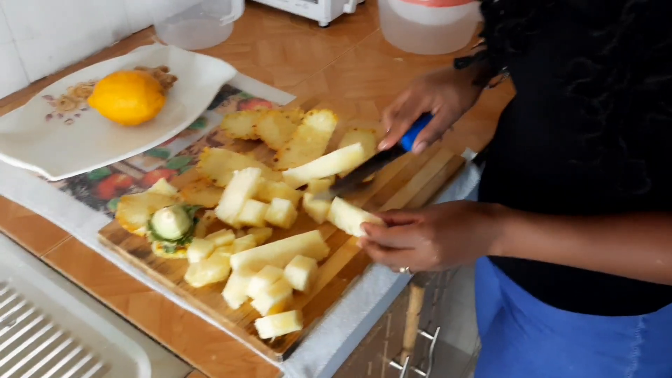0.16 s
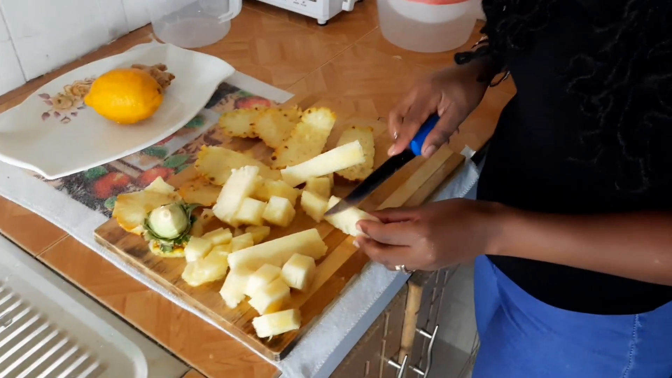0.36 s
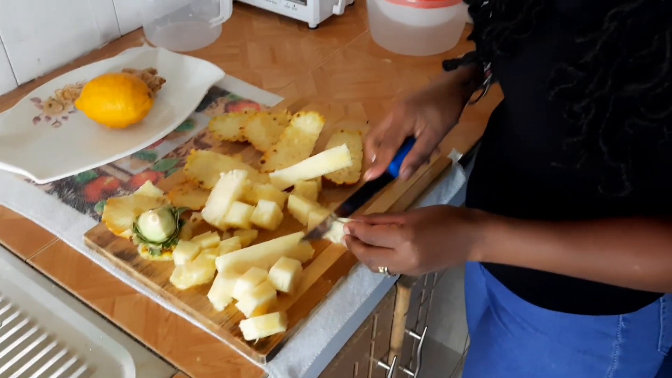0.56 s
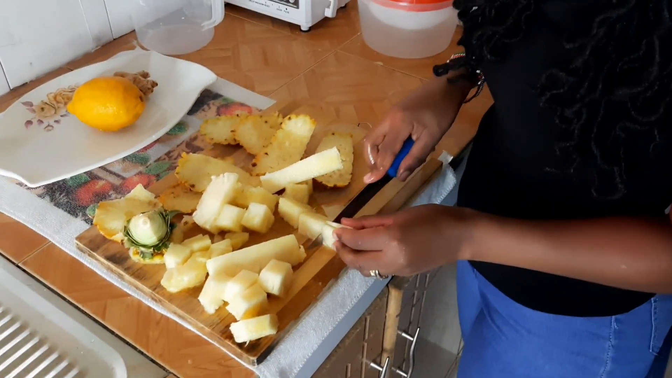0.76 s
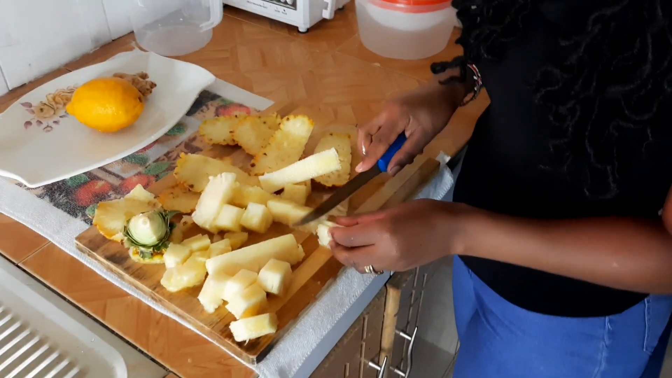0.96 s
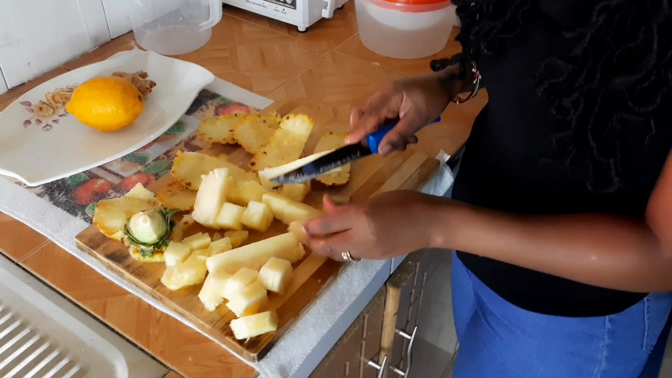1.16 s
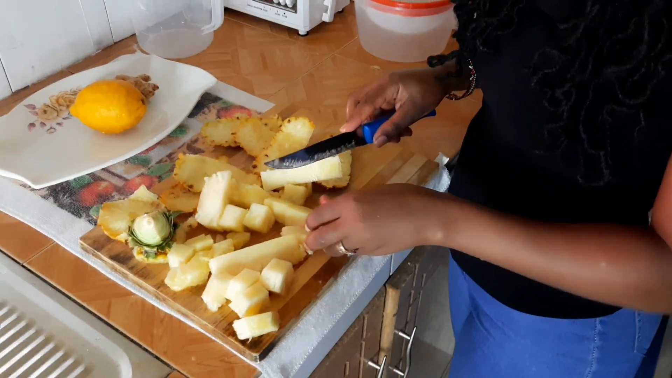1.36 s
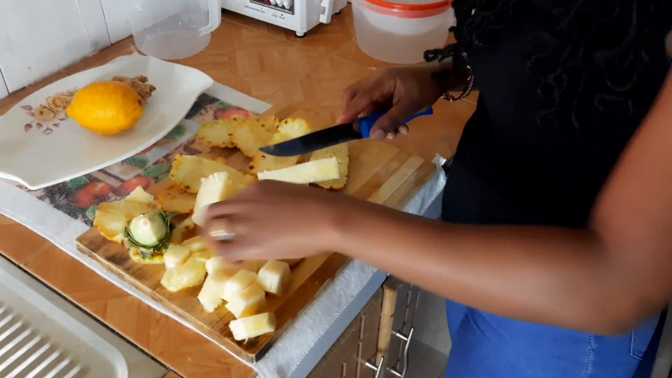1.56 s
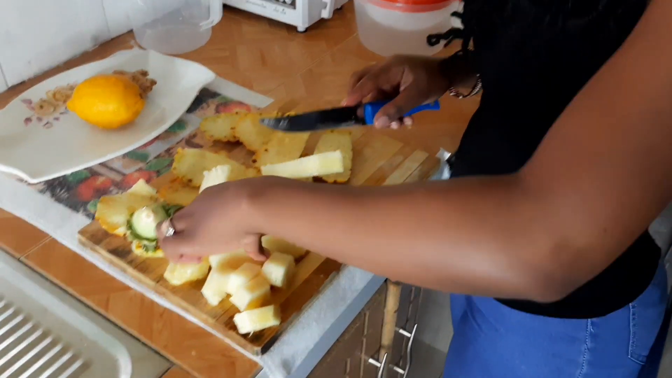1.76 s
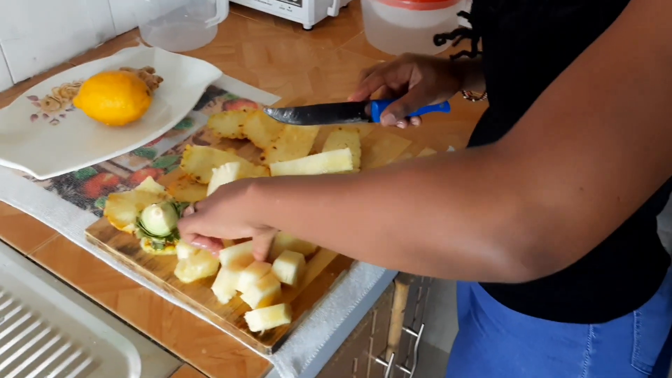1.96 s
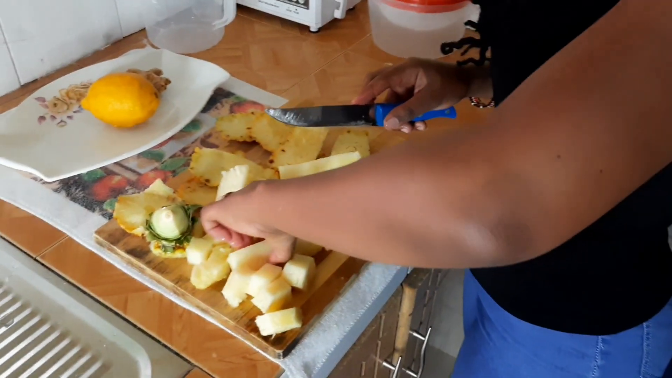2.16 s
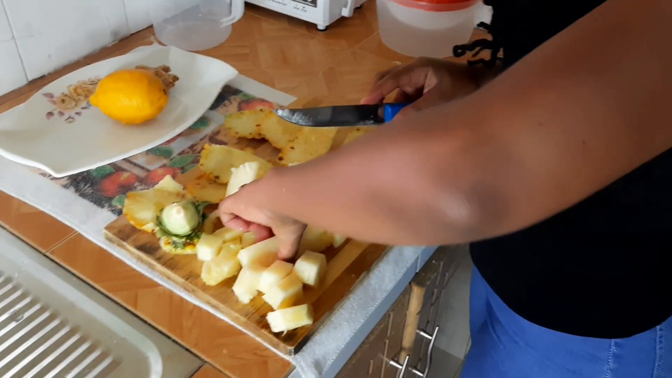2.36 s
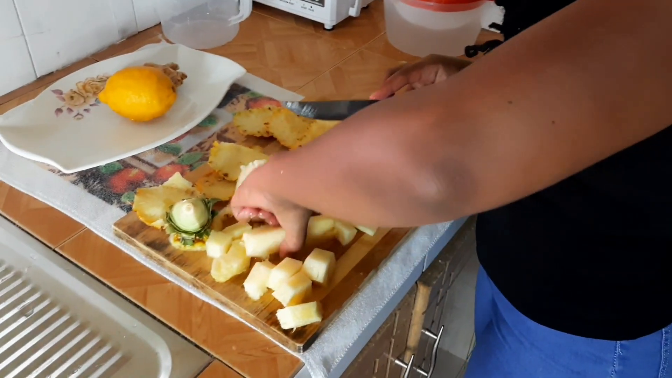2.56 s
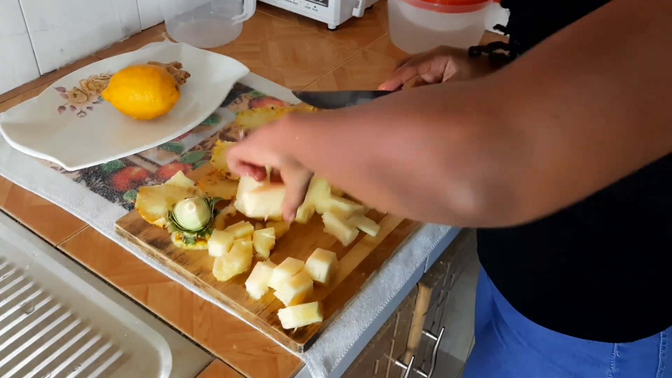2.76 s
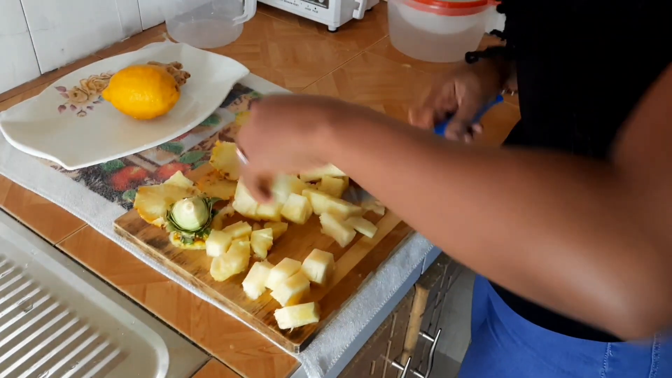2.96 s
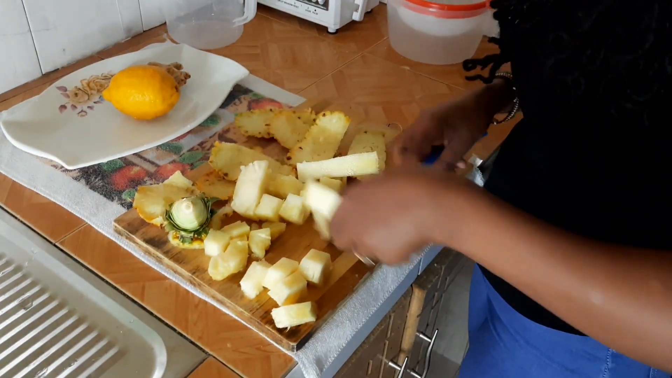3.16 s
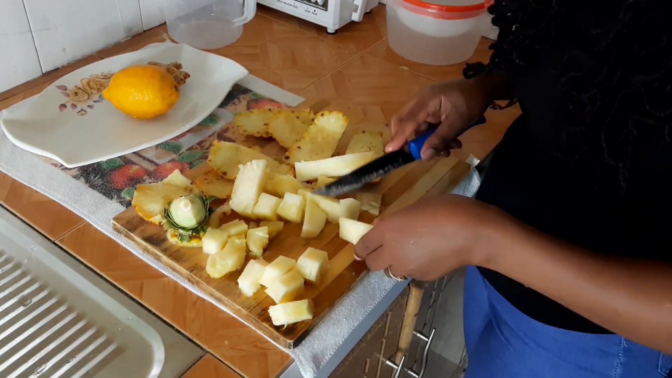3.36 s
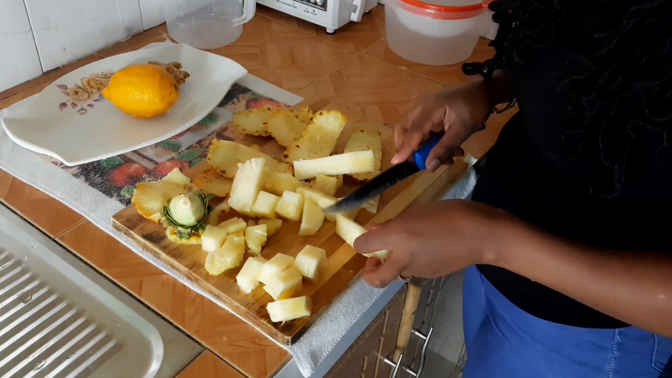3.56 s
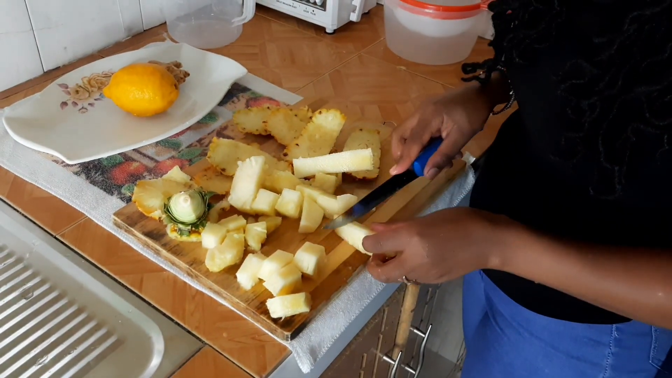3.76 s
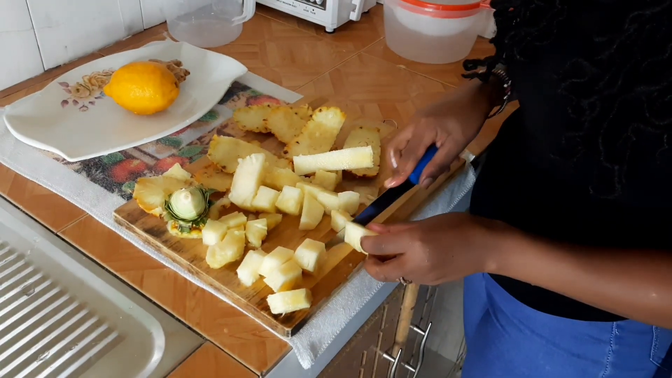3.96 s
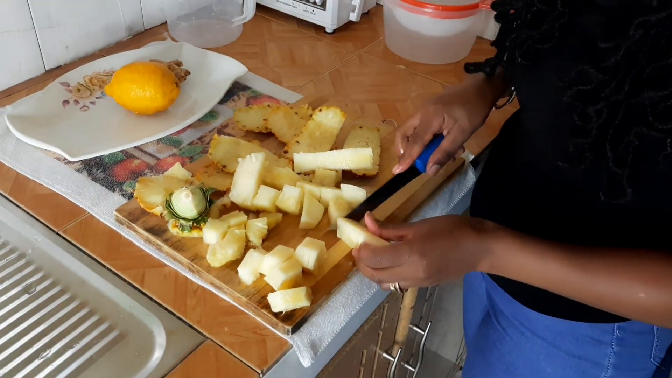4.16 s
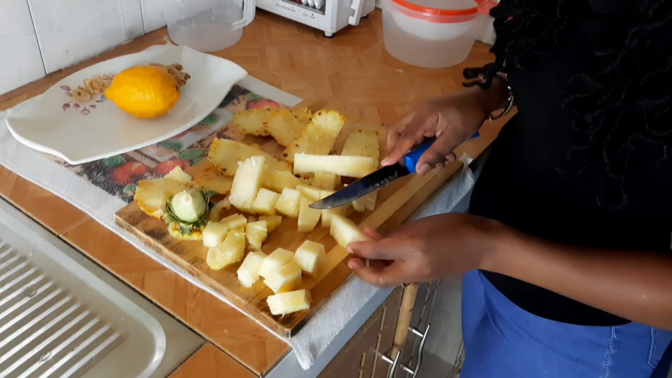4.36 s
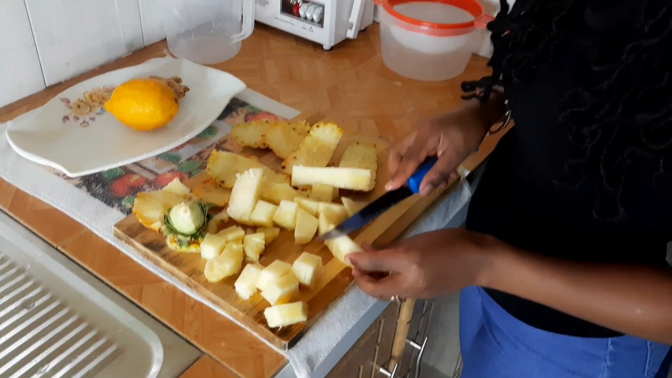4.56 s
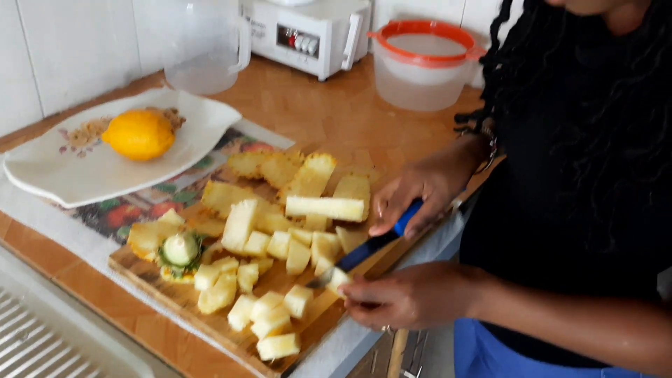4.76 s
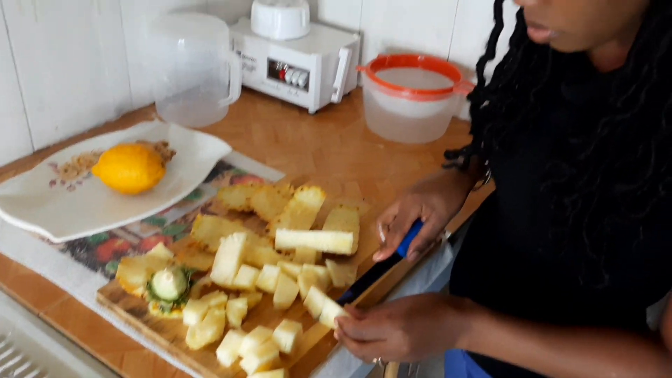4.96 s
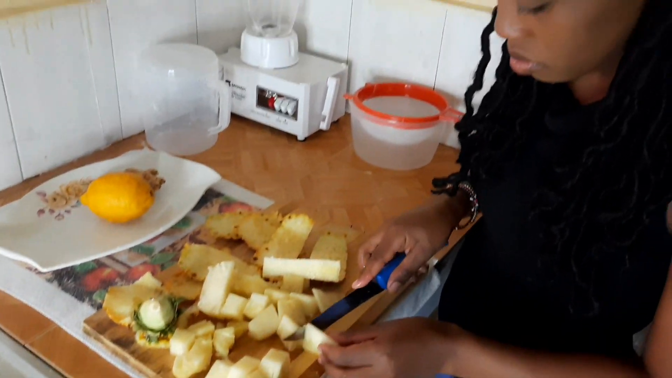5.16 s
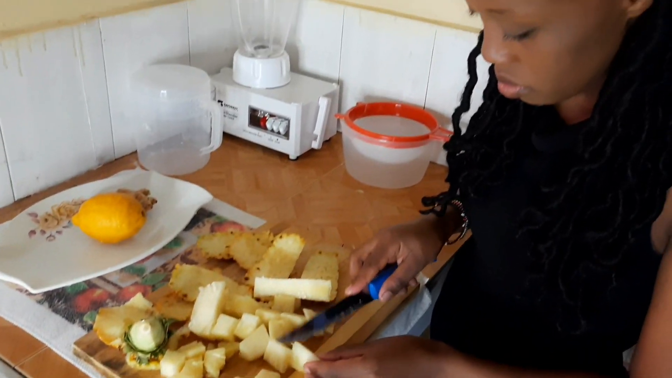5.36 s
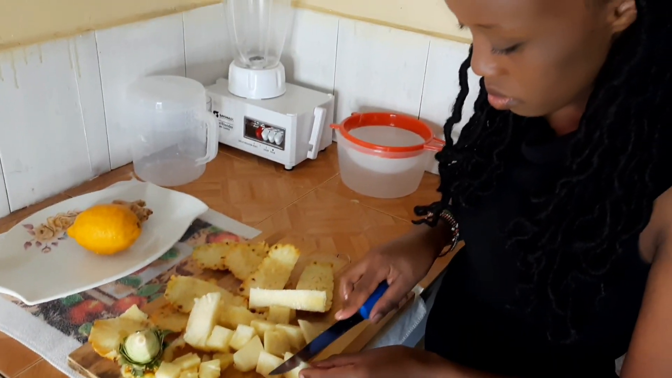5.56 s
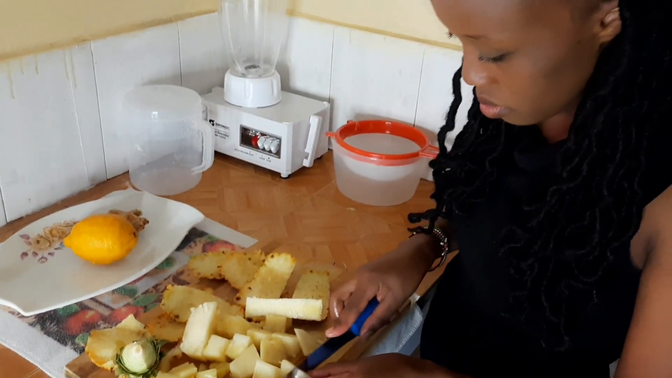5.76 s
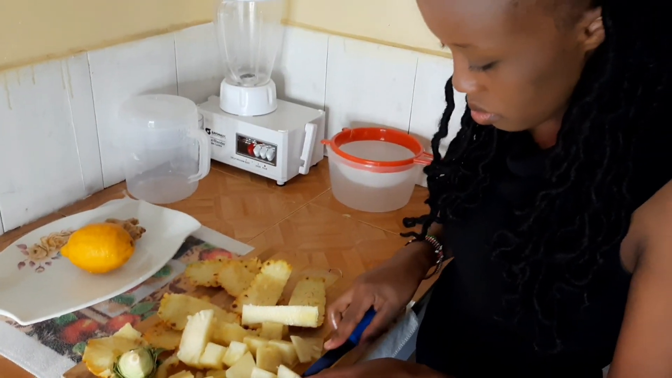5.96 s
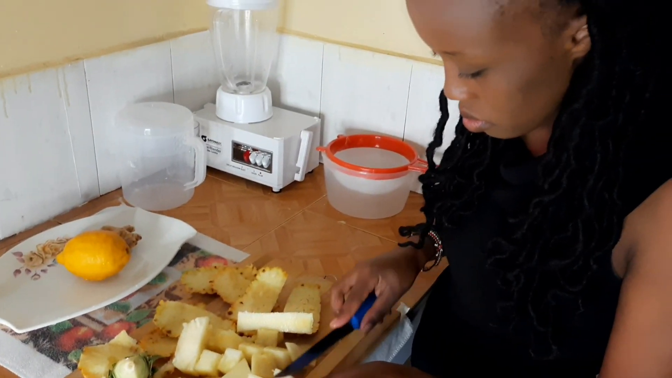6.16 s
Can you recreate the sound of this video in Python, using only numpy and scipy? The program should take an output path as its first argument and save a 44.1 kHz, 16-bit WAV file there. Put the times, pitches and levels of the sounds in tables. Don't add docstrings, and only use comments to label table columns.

```python
import sys
import numpy as np
from scipy import signal
from scipy.io import wavfile

SR = 44100
rng = np.random.default_rng(int(sys.argv[2]) if len(sys.argv) > 2 else 0)


def elevation(decibels):
    levels = np.asarray(decibels, float)
    return 10 ** (levels / 20)


def store_wav(level_fs):
    pcm = np.round(np.clip(np.atleast_2d(level_fs), -1, 1) * 32767)
    wavfile.write(sys.argv[1], SR, pcm.T.astype(np.int16))


N = 273949


def rms_one(x):
    return x / np.sqrt(np.mean(x ** 2) + 1e-20)


def at_hz(points, hz):
    table_hz, values = np.array(points).T
    return np.interp(np.log(hz), np.log(table_hz), values)


def lowpass(x, order, hz):
    return signal.sosfilt(signal.butter(order, hz, fs=SR, output="sos"), x)


def band(x, low_hz, high_hz):
    return signal.sosfilt(signal.butter(2, [low_hz, min(high_hz, .47 * SR)], "band", fs=SR, output="sos"), x)


def drift(rate_hz):
    r = np.exp(-80 * np.pi * rate_hz / SR)
    slow = signal.lfilter([1], [1, -2 * r, r * r], rng.standard_normal(N // 40 + 2002))[2000:]
    return np.interp(np.arange(N) / 40, np.arange(len(slow)), rms_one(slow))


def ring(push, hz, t60):
    r, w = elevation(-60 / (t60 * SR)), 2 * np.pi * hz / SR
    return signal.lfilter([0, np.sin(w)], [1, -2 * r * np.cos(w), r * r], push + 1e-18)


# [pitch_hz, likeness (1 = same)]
LIKENESS = [(60, 0.5), (180, 0.92), (550, 0.61), (1650, -0.1), (4970, 0.018), (15000, 0.0018)]
# [pitch_hz, left_over_right_db]
LEAN = [(60, 2.5), (240, -0.5), (950, -1), (3770, -6.5), (15000, -3.5)]


def stereo_bands(white, gain_of_band, first=0):
    out = 0
    edges = 28 * 2 ** (np.arange(first, 29) / 3)
    for k, (low, high) in enumerate(zip(edges, edges[1:])):
        hz = np.sqrt(low * high)
        mid, side = band(white[k % 2], low, high)
        alike = np.clip(at_hz(LIKENESS, hz), -.99, .99)
        lean = elevation(at_hz(LEAN, hz) * np.array([[.5], [-.5]]))
        pair = np.sqrt(1 + alike) * mid + np.sqrt(1 - alike) * side * [[1], [-1]]
        out = out + gain_of_band(hz) * lean * pair
    return out


# [pitch_hz, level_db per Hz]
RUMBLE = [(18, -50), (30, -18.5), (65, -4), (168, -11), (202, 0.5), (226, -12.5), (318, 1), (509, -18),
          (571, -22.5), (900, -24.5), (1170, -57), (1980, -120)]
# [pitch_hz, level_db per Hz]
HISS = [(530, -36), (900, -14.5), (1340, -16), (1720, -13), (2830, -11.5), (3470, -6), (3860, -12),
        (7680, -4), (10400, -18.5), (14700, -5.5), (16000, -14.5)]
# [pitch_hz, width_hz, level_db]
HUM = [(54.3, 7.25, -76), (68.8, 8.9, -72), (198, 9.9, -65), (314, 250, -73.5), (508, 12, -79.5),
       (1692, 82, -86.5)]


def room_tone():
    rumble_db, hiss_db = -53.5, -69.5
    together = drift(1.8)

    def colour(hz):
        level_db = rumble_db + at_hz(RUMBLE, hz) if hz < 900 else hiss_db + at_hz(HISS, hz)
        return elevation(level_db + 0.25 * together + 0.59 * drift(24))

    out = elevation(12.5) * stereo_bands(rng.standard_normal((2, 2, N)), colour)
    for hz, width_hz, db in HUM:
        t60 = np.log(1000) / (np.pi * width_hz)
        once = ring(rng.standard_normal(N), hz, t60)
        out += elevation(db) * rms_one(ring(once, hz, t60))
    phase = 2 * np.pi * 199.7 * np.arange(N) / SR
    return out + elevation(-58.5 + 1.01 * drift(6.8)) * np.sin(phase)


# [pitch_hz, t60_s]
WALLS = [(250, 0.76), (600, 0.52), (1500, 0.55), (4000, 0.56), (9000, 0.19)]
# [delay_s, left_db, right_db]
ECHOES = [(.0024, -10.5, -8), (.0043, -1, 1.5), (.008, -10, -5.5), (0.01, -13.5, -10.5)]


def kitchen(x, direct_db, early_db, early_t60, tail_db, build_s):
    first_sound = np.zeros((2, round(.03 * SR)))
    first_sound[:, 0] += elevation([direct_db + 3, direct_db])
    for s, left_db, right_db in ECHOES:
        first_sound[0, round(s * SR)] -= elevation(left_db)
        first_sound[1, round(s * SR * 1.06)] -= elevation(right_db)
    out = signal.fftconvolve(x[None], first_sound, axes=1)[:, :N]

    t = np.arange(round(.8 * SR)) / SR

    def dying(hz):
        return elevation(tail_db - 60 * t / at_hz(WALLS, hz)) + elevation(early_db - 60 * t / early_t60)

    spot = 2 * np.pi * .37 * np.arange(N) / SR
    for share in (np.cos(spot), np.sin(spot)):
        tail = stereo_bands(rng.standard_normal((2, 2, len(t))), dying, first=5.89)
        tail = tail * (1 - np.exp(-t / build_s))
        out = out + signal.fftconvolve((share * x)[None], tail, axes=1)[:, :N]
    return out


# [start_s, peak_db, pitch_hz]
THUDS = [
    (0.48, -63, 109),
    (1.299, -57, 115),
    (3.449, -57.5, 113),
    (5.249, -58.5, 141),
]


def thuds():
    out, t = np.zeros(N), np.arange(round(.2 * SR)) / SR
    for s, db, hz in THUDS:
        i = round(s * SR)
        swell = (t / 0.011) * np.exp(1 - t / 0.015)
        out[i:i + len(t)] += elevation(db) * np.sin(2 * np.pi * hz * t) * swell
    return out


# [start_s, level_db]
TAPS = [
    (4.6513, -24.5),
    (4.669, -42.5),
]


def taps():
    clicks = np.zeros(N)
    for s, db in TAPS:
        clicks[round(s * SR)] = -elevation(db)
    push = band(clicks, 190, 1540)
    thump = ring(push, 475, 0.0084) + elevation(-11) * ring(push, 1090, 0.0084)
    return thump * elevation([[-24], [6]])


# [start_s, length_s, pitch_hz,
# level_db]
SLIDES = [
    (1.086, 0.073, 2580, -52.5),
    (1.791, 0.13, 2600, -67),
    (2.288, .2, 3400, -69),
    (2.334, .006, 8600, -56),
    (2.76, 0.097, 3200, -70),
    (2.778, 0.0061, 7700, -53),
    (5.706, 0.04, 4670, -65),
    (5.951, 0.093, 2770, -62),
]


def slides():
    out = np.zeros((2, N))
    for s, length, hz, db in SLIDES:
        stroke = np.sin(np.pi * np.arange(round(length * SR)) / (length * SR))
        swish = band(rng.standard_normal((2, round(.3 * SR))), hz / 1.18, hz * 1.14)[:, :len(stroke)]
        i = round(s * SR)
        out[:, i:i + len(stroke)] += elevation(db) * rms_one(swish) * stroke * elevation([[-3], [3]])
    return out


def strokes(rows, attack_s, release_s, body_db):
    t = np.arange(0, N + 19, 20)[:N // 20 + 1] / SR
    out = np.zeros((3, len(t)))
    for s, hold, db, sizzle_db in rows:
        rise = np.clip((t - s) / attack_s, 0, 1)
        fade = np.exp(-np.maximum(t - s - attack_s - hold, 0) / release_s)
        levels = elevation(db + np.array([[body_db], [0], [sizzle_db]]))
        out += (levels * rise * fade) ** 2
    return np.array([np.interp(np.arange(N) / SR, t, row) for row in out])


# [start_s, hold_s, level_db, sizzle_db]
SLICES = [(-0.02, 0.068, -58, -4), (0.855, 0.045, -60, -4.5), (0.985, 0.018, -64, -7),
          (4.18, .025, -63.5, -5), (4.215, 0.022, -58, -4), (5.003, 0.026, -58, -3), (5.1, .04, -63, -6),
          (5.15, 0.031, -58.5, -10), (5.945, .015, -60, -8), (6.055, 0.047, -61, -4),
          (6.11, 0.043, -58, -3.5)]
# [start_s, hold_s, level_db, sizzle_db]
PULLS = [
    (0.17, 0.056, -57, -4.5),
    (0.283, 0.0073, -48.5, -9.5),
    (1.04, 0.055, -59, -13),
    (1.15, 0.029, -59, -10),
    (3.425, 0.038, -52.5, -7),
    (3.515, .012, -56.5, -10),
    (5.31, .055, -59, -10),
]
# [start_s, hold_s, level_db, sizzle_db]
GRIPS = [(0.45, .04, -66.5, -3), (0.6, .2, -77, -4), (1.2, 0.093, -65.5, -4.5), (1.45, .02, -65, -6),
         (1.74, .03, -64.5, 0), (1.78, .09, -61, -3), (1.92, 0.13, -64.5, -0.5), (2.1, 0.2, -66, -3),
         (2.33, 0.16, -68.5, -3.5), (2.53, 0.11, -67, -3), (2.77, 0.055, -70.5, -9), (2.95, 0.16, -75, -5),
         (3.6, 0.14, -67.5, -10), (3.9, .015, -73.5, 0), (4.66, 0.052, -71.5, -3), (5.7, .03, -70, -15),
         (5.76, .02, -79.5, 3), (5.86, .04, -65, -5)]
# [pitch_hz, level_db per Hz]
FIBRE = [(710, -30), (1200, -6.5), (1920, -5.5), (2620, -9.5), (5090, 2.5), (7570, 7.5), (9990, -6),
         (11900, 9.5), (15500, 6)]


def wet_flesh():
    splashes = [(s, 0, -56 + .4 * (db + 16), -6.5) for s, db, *_ in CHOPS]
    power = strokes(SLICES, attack_s=.015, release_s=0.057, body_db=9)
    power = power + strokes(PULLS, attack_s=0.0073, release_s=.04, body_db=11)
    power = power + strokes(GRIPS, attack_s=0.023, release_s=.06, body_db=5)
    power = power + strokes(splashes, attack_s=.003, release_s=.07, body_db=3)
    rest_db = -79
    body, middle, sizzle = np.sqrt(power + elevation(rest_db) ** 2)

    bursts_db = 4.0 * np.minimum(rng.exponential(1, N), 4) + 0.44 * drift(30)
    grains = rng.standard_normal((2, 2, N)) * elevation(bursts_db)

    def colour(hz):
        touch = body if hz < 4200 else sizzle if hz > 9500 else middle
        return elevation(at_hz(FIBRE, hz)) * touch

    return stereo_bands(grains / grains.std(), colour, first=14.095)


# [start_s, peak_db, pitch_hz]
SNAPS = [(0.046, -30.5, 7460), (0.2922, -46, 3350), (0.8715, -36, 7330), (0.8903, -34, 7390),
         (1.1544, -32, 3360), (3.4436, -70.5, 3110), (3.5281, -29, 3960), (3.733, -34.5, 6200),
         (4.1912, -44, 7380), (4.212, -34, 5680), (5.01, -47, 6850), (5.027, -45, 8070), (5.045, -27, 7620),
         (5.1637, -34.5, 7190), (5.905, -39, 6000), (5.9534, -32.5, 3920), (5.9904, -48, 3320),
         (6.0686, -38, 7010)]


def snaps():
    out, t = np.zeros(N), np.arange(400) / SR
    for s, db, hz in SNAPS:
        i = round((s + .0012) * SR)
        tick = band(rng.standard_normal(len(t)), hz / 1.4, hz * 1.8) * np.exp(-t / .0014)
        out[i:i + len(t)] += elevation(db - 10) * tick
    return out


# [pitch_hz, level_db, t60_s]
BOARD = [(287, -3, 0.021), (415, -4.5, 0.021), (522, -3, 0.025), (724, -1, 0.012), (931, -2, 0.019),
         (1280, -1.5, 0.013), (1440, -6.5, 0.016), (1695, -3, 0.011), (1950, -4, 0.015), (2298, -1, 0.006),
         (2498, -8.5, 0.022), (2783, -5.5, 0.0068), (3290, -10, 0.012), (3720, -3, 0.0033)]


def board(force, low_db, high_db):
    rings = 0
    for k, (hz, db, t60) in enumerate(BOARD):
        spot_db = low_db * (hz < 800) + high_db * (hz > 1500)
        luck_db = rng.normal(0, 1.5)
        rings = rings + (-1) ** k * elevation(db + spot_db + luck_db) * ring(force, hz, t60)
    return signal.sosfilt(signal.butter(4, 230, "high", fs=SR, output="sos"), rings)


# [start_s, length_s, level_db, low_tones_db, high_tones_db]
DRAGS = [(0.107, 0.009, -50.5, -1, 4), (0.24, 0.072, -56.5, 5, 7), (1.139, 0.038, -54.5, 5, 4.5),
         (3.43, 0.026, -46.5, -14, 5.5), (3.52, 0.014, -72, 2.5, 7), (4.211, 0.022, -69, 6.5, -2),
         (5.296, 0.069, -53.5, -1, 1), (0.86, 0.061, -77.5, 7.5, 12.5), (0.0015, 0.036, -70.5, 1, 0),
         (5.013, 0.053, -73, 2, 8), (1.157, 0.0158, -51.5, 3.5, 6), (0.46, 0.0078, -61, 6, 0)]


def drags():
    out, t = np.zeros(N), np.arange(round(.25 * SR)) / SR
    for s, length, db, low_db, high_db in DRAGS:
        slips = (rng.random(len(t)) < 900 / SR) * rng.standard_normal(len(t))
        slips = lowpass(slips, 4, 3400)
        stroke = np.sin(np.pi * np.clip(t / length, 0, 1))
        i = round(s * SR)
        out[i:i + len(t)] += elevation(db) * board(slips * stroke, low_db, high_db)[:N - i]
    return out


# [start_s, blow_db, tones_under_800_hz_db, tones_over_1500_hz_db, steel_crack_db]
CHOPS = [
    (0.1165, -15.5, 1.5, 8.5, -2),
    (1.019, -28, 2, -2.5, -6),
    (3.392, -22, 2, 0.5, -1),
    (4.248, -15.5, -3.5, 1, 7.5),
    (5.205, -22, -1, 2.5, -3.5),
    (6.168, -9.5, -2.5, 4, 4),
]


def chops():
    out = np.zeros(N)
    click = np.zeros(round(.15 * SR))
    click[0] = -1
    crack = band(click, 4330, 7040) + elevation(-13) * band(click, 9600, 15000)
    lead = round(0.0028 * SR)
    tip_db = -20.5
    for s, db, low_db, high_db, crack_db in CHOPS:
        contact = lowpass(click, 6, 3490 + 69.5 * (db + 15))
        contact = elevation(tip_db) * contact + np.roll(contact, lead)
        knock = elevation(-7.5) * board(contact, low_db, high_db)
        blow = knock + elevation(crack_db) * np.roll(crack, lead)
        i = round((s + .0012) * SR) - lead
        out[i:i + len(click)] += elevation(db) * blow[:N - i]
    return out


def scene():
    ticks = snaps()
    near = chops() + drags() + elevation(-14) * ticks
    room = kitchen(near, direct_db=-2.0, early_db=-33.5, early_t60=0.13, tail_db=-28.5, build_s=0.0013)
    close_ticks = ticks * elevation([[-5], [0]])
    return room + close_ticks + wet_flesh() + taps() + thuds() + room_tone() + slides()


# [pitch_hz, width_hz, level_db]
PORT = [(7560, 420, 4.5), (8980, 1500, -4), (4235, 600, -3.5)]


def top_cut(x):
    return signal.sosfilt(signal.butter(12, 16340, fs=SR, output="sos"), x)


def record(dry):
    for hz, width_hz, db in PORT:
        dry = dry + (elevation(db) - 1) * signal.lfilter(*signal.iirpeak(hz, hz / width_hz, fs=SR), dry)
    mix = signal.sosfilt(signal.ellip(12, .5, 60, 15800, fs=SR, output="sos"), dry)
    return top_cut(mix)


dry = scene()
out = record(dry)
store_wav(out)
```